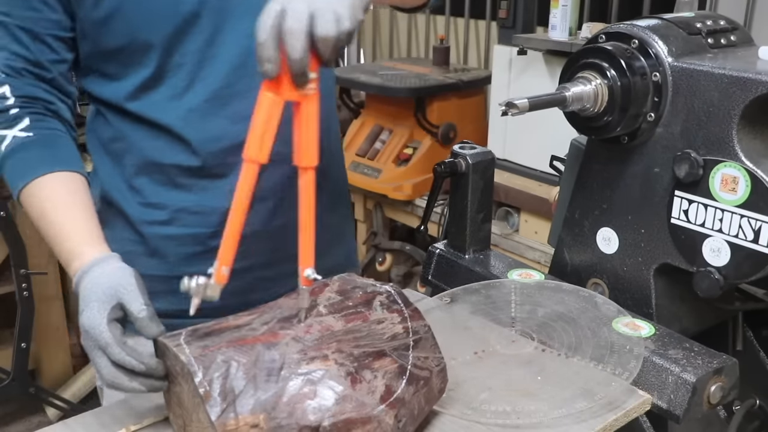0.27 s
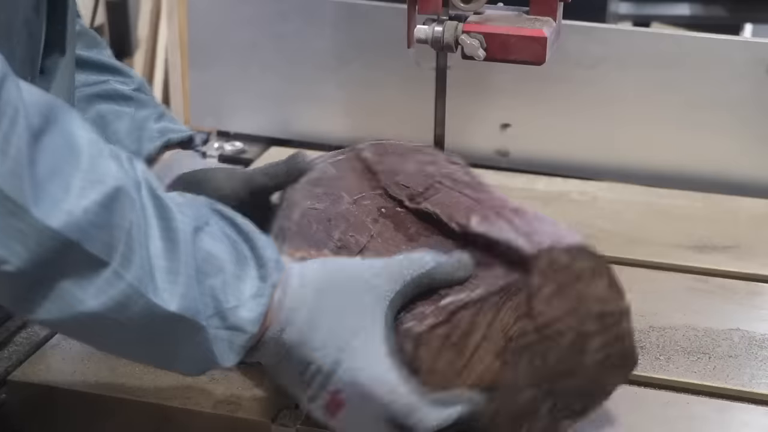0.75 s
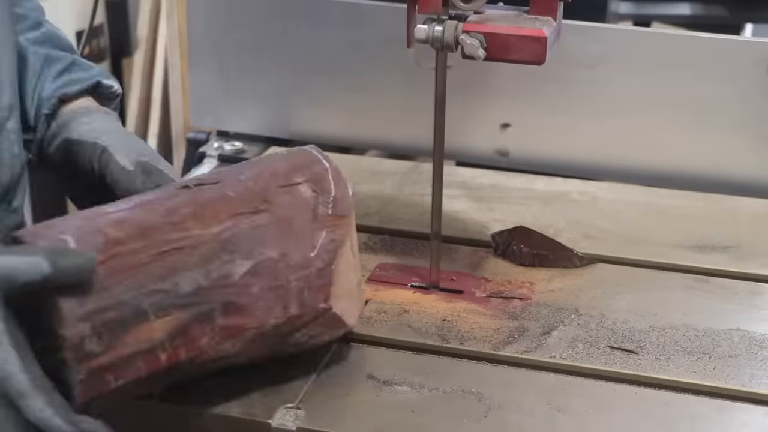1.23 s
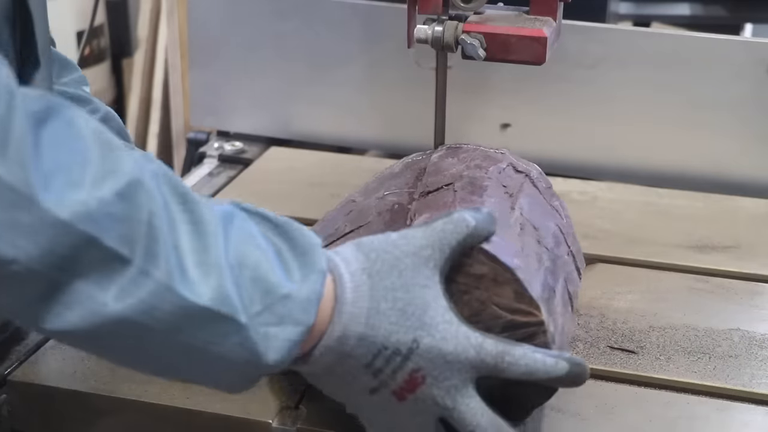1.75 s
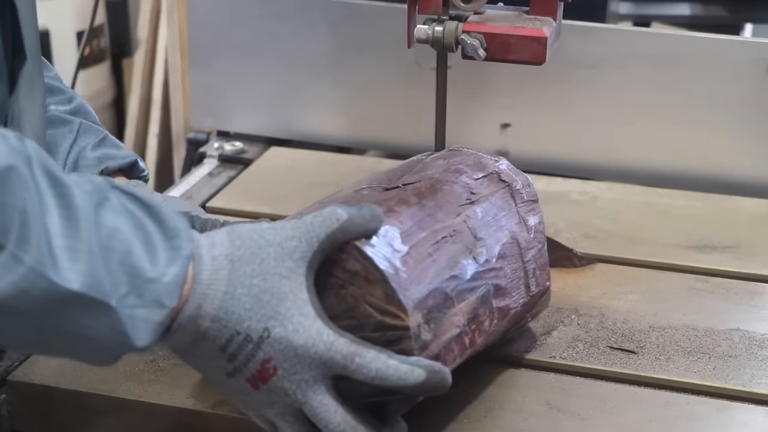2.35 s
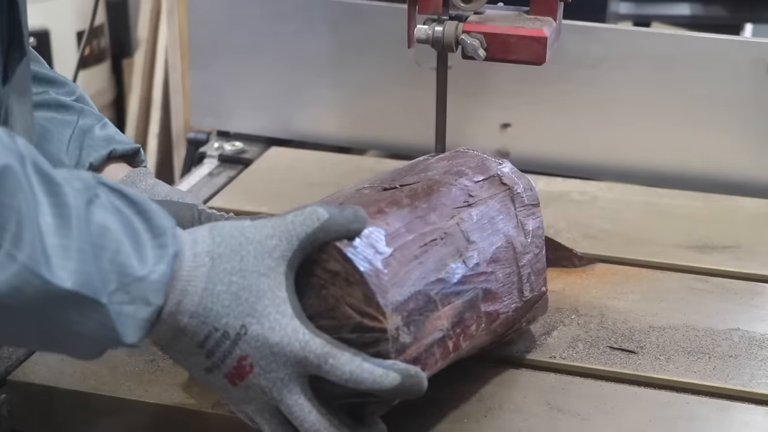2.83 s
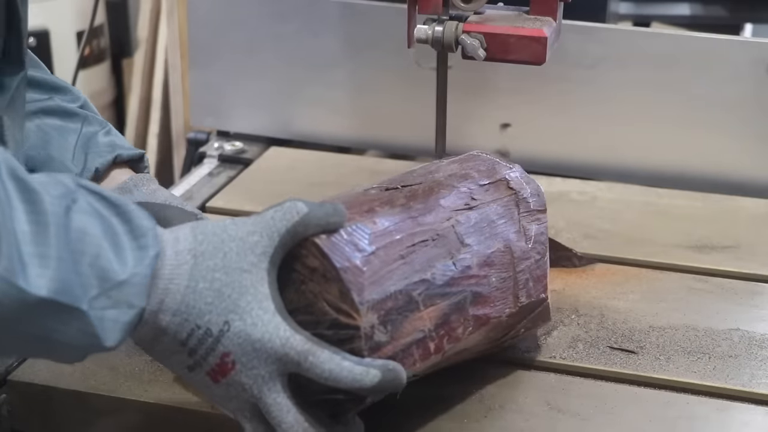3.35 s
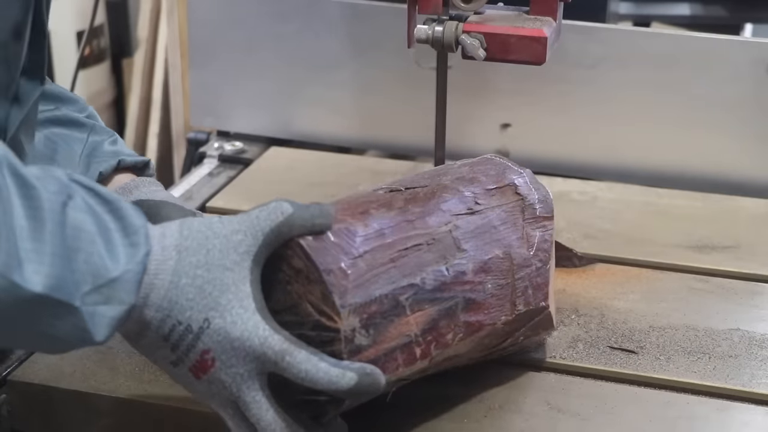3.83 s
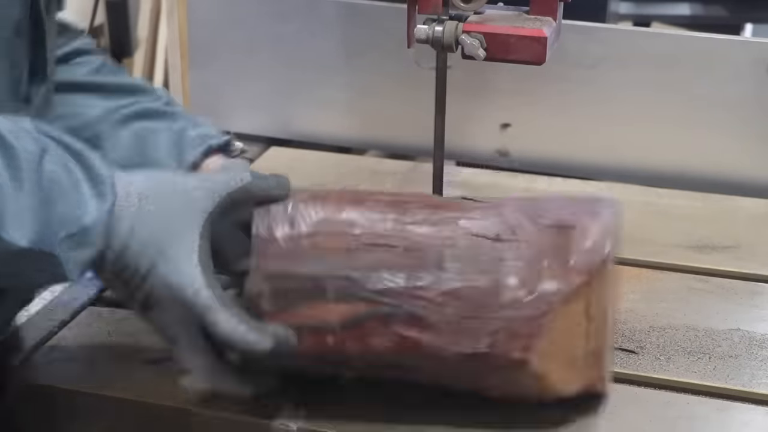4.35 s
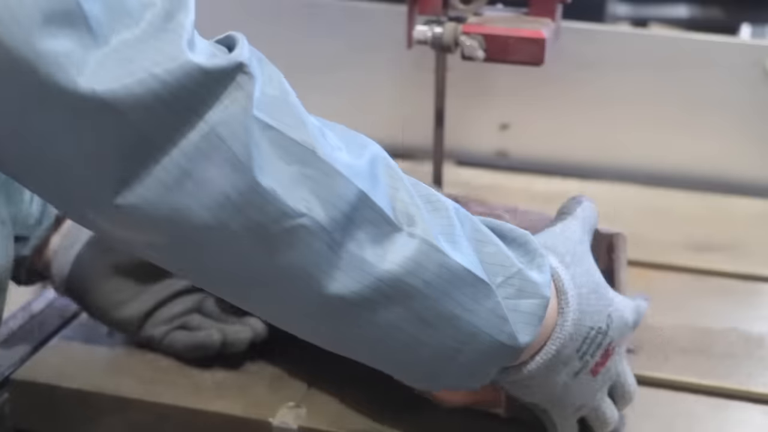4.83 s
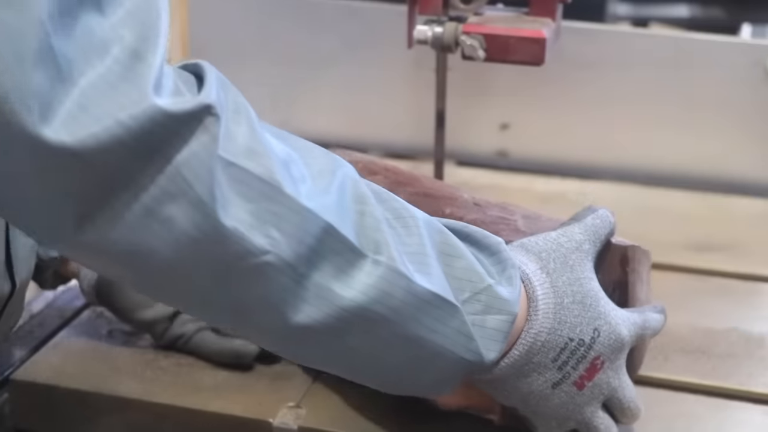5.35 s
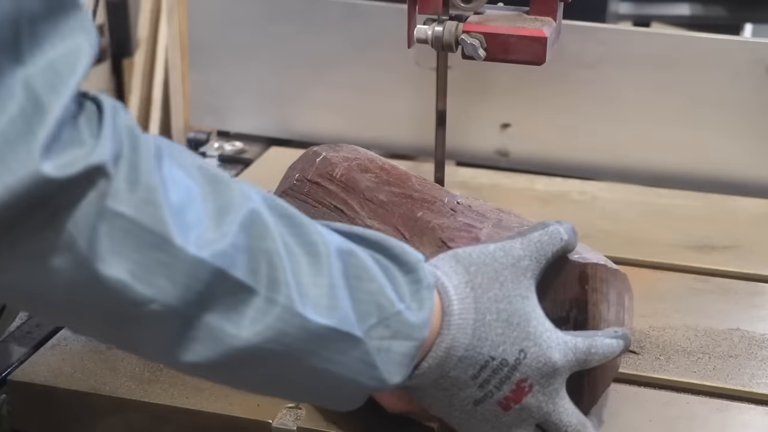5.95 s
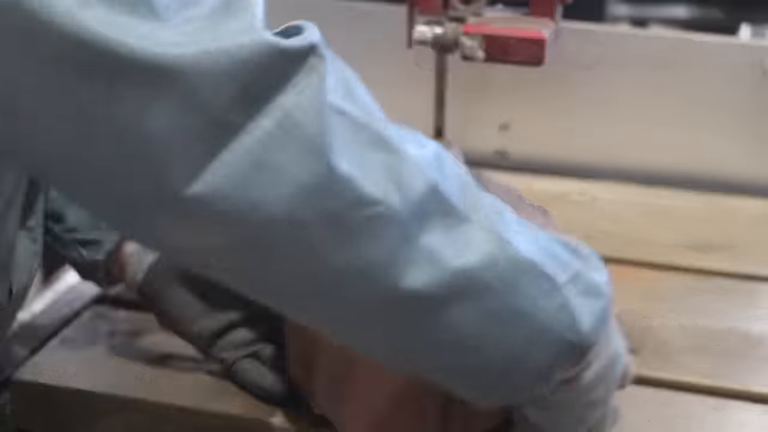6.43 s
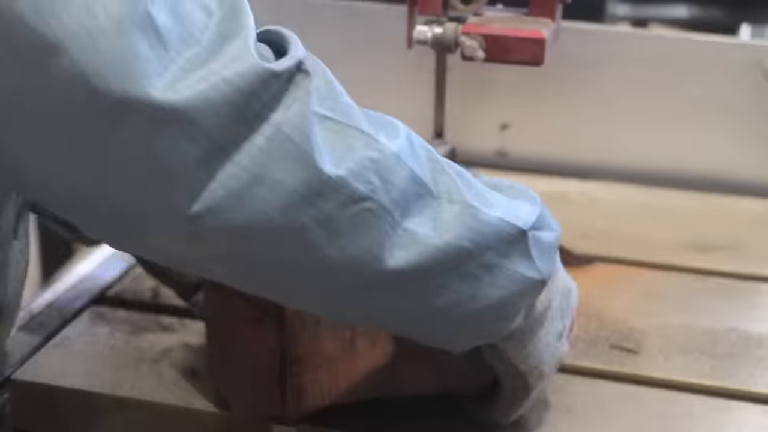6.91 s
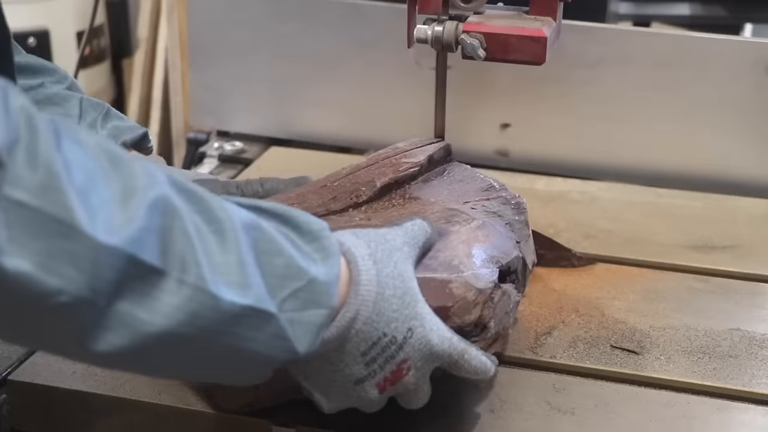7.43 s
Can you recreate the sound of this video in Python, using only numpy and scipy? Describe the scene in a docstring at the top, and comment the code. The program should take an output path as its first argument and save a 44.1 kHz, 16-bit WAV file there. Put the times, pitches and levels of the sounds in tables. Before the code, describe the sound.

Low ventilation and machine hum, one hard tap with a short woody ring, then an abrupt cut to a bandsaw heard close up indoors. The blade hisses and rattles beneath a thin, piercing whine, squealing roughly in its guides. The noise drops in the middle, with fainter sliding whistles, then swells again in louder bursts of squealing, hops to a lower groan and bending whistles, still running at the end.

```python
"""A workshop hums while a tool taps a log; then, abruptly, a bandsaw runs and the log is fed through it.
The free blade hisses, rings and squeals in its guides, under a high whine that follows its speed.
In the cut the wood damps and slows the blade, and most of its sliding, arching whistles sound there.
Shaped noise makes the hiss, rattle and ringing; sine waves make the hum, whine, squeals and whistles."""
import sys
import numpy as np
from scipy import signal
from scipy.fft import rfft, irfft, next_fast_len
from scipy.io import wavfile

SR = 44100
rng = np.random.default_rng(int(sys.argv[2]) if len(sys.argv) > 2 else 0)


def transcribe(u):
    """Save the signal u as a 16-bit wav file named by the first command-line argument.

    u: samples, shape (n,) or (channels, n), limited to [-1, 1]; the rate is SR.
    q: integer samples, one column per channel.
    """
    v = np.clip(np.atleast_2d(u).T, -1, 1)
    q = np.round(v * 32767).astype(np.int16)
    wavfile.write(sys.argv[1], SR, q)


N = 338247
T = np.arange(N) / SR  # time of every sample, s
EDGE_HZ = 15800  # upper edge of the sound


def amp(db):
    """Turns decibels into gain."""
    return 10 ** (np.asarray(db) / 20)


def unit(x):
    """Scales a signal to rms 1."""
    return x / np.sqrt(np.mean(abs(x) ** 2) + 1e-20)


def read(points, hz):
    """Reads a spectrum table on a log-frequency axis."""
    f, value = np.transpose(points)
    return np.interp(np.log(hz + 1), np.log(f), value)


def curves(rows):
    """Gives each column of a curve table at every sample."""
    s, *columns = np.transpose(rows)
    return [np.interp(T, s, column) for column in columns]


def gate(start, end, fade):
    """One between two moments, with short ramps centred on them."""
    opening = np.clip((T - start) / fade + .5, 0, 1)
    closing = np.clip((end - T) / fade + .5, 0, 1)
    return opening * closing


def drift(rate, size=N):
    """Smooth chance movement of rms 1, up to the given rate in Hz."""
    count = int(size / SR * 2 * rate) + 4
    fine = signal.resample(rng.standard_normal(16384)[:count], 4 * count)
    return unit(np.interp(np.arange(size), np.linspace(0, size, len(fine)), fine))


# how wide the noise at the saw spreads: f/Hz, side against middle level/dB
WIDTH = [(60, -2), (120, -1), (240, -0.5), (480, -9.5), (950, -10), (1890, -29), (3770, -17), (7520, -6),
         (15000, 0)]


def noise(shape, spread=WIDTH):
    """Two-channel noise with gain shape(Hz), partly alike left and right."""
    size = next_fast_len(N)
    hz = np.fft.rfftfreq(size, 1 / SR)
    middle, side = rfft(rng.standard_normal((2, size)))
    both = middle + amp(read(spread, hz)) * side * np.array([[1], [-1]])
    return unit(irfft(both * shape(hz), size)[:, :N])


def wash(spectrum, spread=WIDTH):
    """Noise coloured by a spectrum table."""
    return noise(lambda hz: amp(read(spectrum, hz)), spread)


def ringing(modes):
    """Narrow resonances kept going by friction, made as narrow peaks in noise."""
    def gain(hz):
        power = sum(amp(db) ** 2 / w / (1 + ((hz - f) / w) ** 2) ** 2 for f, w, db in modes)
        return np.sqrt(power)
    total = np.sqrt(sum(amp(db) ** 2 for _, _, db in modes))
    return noise(gain) * total


def tones(table, flutter_db, wobble, rate, spread=WIDTH):
    """Steady lines wavering in strength and phase; reflections shift each one between the ears."""
    out = np.zeros((2, N))
    for hz, db in table:
        shift = amp(read(spread, hz)) * rng.choice([-1, 1]) * np.array([[1], [-1]])
        strength = amp(db + flutter_db * drift(rate))
        phase = 2 * np.pi * hz * T + wobble * drift(rate) + shift
        out += strength * np.sqrt(2) * np.sin(phase)
    return out


def room(x, t60, wet_db):
    """Direct sound plus a diffuse tail that differs at each ear."""
    t = T[:SR // 2]
    tail = rng.standard_normal((2, len(t))) * amp(-60 * t / t60) * (t > .001)
    tail = tail / np.linalg.norm(tail[0])
    return x + amp(wet_db) * signal.fftconvolve(x[None], tail, axes=1)[:, :N]


def patchy(x, depth_db, count=24):
    """Neighbouring bands of a sound swell and fade on their own."""
    size = next_fast_len(N)
    spectrum = rfft(x, size)
    place = np.fft.rfftfreq(size, 1 / SR) / EDGE_HZ * count
    out = np.zeros((2, N))
    for k in range(count + 1):
        band = irfft(spectrum * np.clip(1 - abs(place - k), 0, 1), size)[:, :N]
        out += band * amp(depth_db * drift(5))
    return unit(out)


def stick_slip(rows, cling, boost_db, jitter, slip, flutter_db, flutter_rate, rasp):
    """A friction tone clings to the blade's even modes, is louder on them, and sags as the grip slips."""
    mode_hz, gap_hz = 4420, 470  # one blade mode, and the step to the next
    start, end = rows[0][0], rows[-1][0]
    span = (T >= start) & (T < end)
    hz, db = (curve[span] for curve in curves(rows))
    size = len(hz)
    grip = drift(flutter_rate, size)
    off_mode = 2 * np.pi * (hz - mode_hz) / gap_hz
    hz = hz - cling * gap_hz / (2 * np.pi) * np.sin(off_mode)
    slipping = np.maximum(.7 * drift(130, size) - grip, 0)
    hz = hz * (1 + jitter * drift(400, size) - slip * slipping)
    strength = amp(flutter_db * np.tanh(grip) + boost_db * np.cos(off_mode))
    strength = strength * (1 + rasp * drift(350, size))
    out = np.zeros(N)
    out[span] = amp(db) * unit(strength) * np.sqrt(2) * np.sin(2 * np.pi * np.cumsum(hz) / SR)
    return out * gate(start + .005, end - .005, .01)


# colour of the workshop air: f/Hz, relative level/dB
SHOP = [(25, -30), (50, -18), (70, -1), (100, -5.5), (150, 0), (250, -4), (450, -6), (950, -6.5),
        (1440, -13.5), (2550, -12.5), (3200, -19.5), (7260, -28), (15500, -32)]
# how wide the workshop spreads: f/Hz, side against middle level/dB
SHOP_WIDTH = [(60, -27), (180, -22), (550, -11), (1650, -2.5), (4970, 0.5), (15000, 0)]
# machines humming in the workshop: f/Hz, level/dB
HUM = [(76, -50), (120, -60), (149, -60.5), (167, -57), (221, -61.5), (339, -61), (608, -60.5)]


def workshop():
    """Steady ventilation is coloured noise; humming machines are wavering low tones."""
    air = amp(-46.5) * wash(SHOP, SHOP_WIDTH)
    return air + tones(HUM, flutter_db=1.5, wobble=0.32, rate=4.7, spread=SHOP_WIDTH)


# knocks on the log: t/s, starting level/dB, centre f/Hz, width/Hz, time to fall 60 dB t/s
KNOCKS = [(.019, -50, 6000, 3000, 0.056), (.253, -39, 820, 350, 0.18), (0.261, -30.5, 4530, 2600, 0.016),
          (0.2604, -30, 2900, 900, 0.021), (.264, -43.5, 3440, 3480, 0.11), (.274, -37, 754, 500, 0.083),
          (1.181, -47, 1240, 500, 0.055)]


def knocks():
    """Dying noise bursts: the tool point's tick, the duller blow, and the log set on the saw table."""
    out = np.zeros(N)
    for s, db, centre, width, t60 in KNOCKS:
        burst = noise(lambda hz: hz / (hz + 400) / (1 + ((hz - centre) / width) ** 2))[0]
        attack = np.clip((T - s) * centre / 2, 0, 1)  # two cycles of the centre pitch
        out += burst * attack * amp(db - 60 * np.clip(T - s, 0, 1) / t60)
    return room(out, t60=0.18, wet_db=-7.5)


# ringing of the log and its bench: f/Hz, starting level/dB, time to fall 60 dB t/s
LOG = [(124.5, -36.5, 0.35), (217, -35, 0.27), (271.6, -31.5, 0.24), (487, -36.5, 0.2), (744, -37, 0.16),
       (843, -38, 0.28), (887, -33.5, 0.14), (917, -38.5, 0.26)]


def log_thud(start=.273, rise=0.0027):
    """The log and its bench ring briefly under the tap, as dying sine waves."""
    t = np.clip(T - start, 0, 2)
    modes = np.zeros(N)
    for hz, db, t60 in LOG:
        modes += amp(db - 60 * t / t60) * np.sin(2 * np.pi * (hz * t + rng.random()))
    return room(modes * (1 - np.exp(-t / rise)), t60=.2, wet_db=-25)


# the free blade bears on its guides:
# start t/s, attack t/s, easing-off start t/s, release t/s, strength 0-1
PUSHES = [(.76, 0.11, 1.62, 1.65, 0.93), (3.63, .06, 3.67, 0.12, 0.2), (4.33, 0.076, 4.78, 0.86, 0.95),
          (5.4, .06, 5.5, 0.303, 0.65), (5.6, 0.085, 5.76, .3, 0.5), (6.01, 0.079, 6.6, 1.2, 1),
          (7.3, .12, 7.47, 0.36, .8)]


def push():
    """How hard the blade bears on its guides, 0-1: each push rises, holds and eases off."""
    efforts = []
    for s, attack, eases, release, strength in PUSHES:
        shape = np.minimum((T - s) / attack, 1 - (T - eases) / release)
        efforts.append(strength * np.clip(shape, 0, 1))
    return np.max(efforts, axis=0)


def drag():
    """How much the wood holds the blade back, 0-1: it takes over as the push weakens."""
    return np.clip(1.4 * (1 - push()), 0, 1)


# partials of the tooth pattern, the 25th being the whine: multiple, relative level/dB
ORDERS_DB = [(1, -35), (2, -38.5), (21, -17.5), (23, -13), (24, -14), (25, 1.5), (26, -40), (27, -14.5),
             (29, -16.5)]
FREE_HZ, SAG_HZ = 9987, 48  # whine of the free blade, and its drop when the wood slows it
WHINE_DB, WHINE_RISE_DB = -54.5, 9.5  # level with the blade slowed in the wood, and its rise at push 1


def whine(flutter_db=4, flutter_rate=4, waver_db=2.1, waver_rate=5):
    """The repeating teeth give clean partials that sag and waver under drag; weak ones swell and fade."""
    whine_hz = FREE_HZ - SAG_HZ * drag() + 2 * drift(40)
    turns = np.cumsum(whine_hz) / SR / 25
    partials = np.zeros(N)
    for k, level in ORDERS_DB:
        swell_db = flutter_db * np.tanh(drift(flutter_rate)) * (level < -6)
        partials += amp(level + swell_db) * np.sin(2 * np.pi * (round(k) * turns + rng.random()))
    waver = waver_db * drag() * drift(waver_rate) + .5 * drift(30)
    level_db = WHINE_DB + WHINE_RISE_DB * push() + waver
    return unit(partials) * amp(level_db) * amp([[-4.5], [3]])  # louder on the right


# colour of the tooth hiss: f/Hz, relative level/dB
HISS = [(3400, -49), (5800, -9.5), (7140, -1), (7990, -7), (8400, -2), (10000, -1.5), (12000, -2.5),
        (15100, -4.5), (15700, -5.5)]


def tooth_hiss():
    """The running teeth hiss in grains, louder with the push and rougher with the drag."""
    grain = amp((1.0 + 0.6 * drag()) * drift(300) + 0.68 * drift(26))
    level_db = -54 + 7.5 * push()
    return amp(level_db) * patchy(wash(HISS), depth_db=1.03, count=16) * unit(grain)


# colour of the band rattle: f/Hz, relative level/dB
RATTLE = [(150, -48), (400, -27), (900, -15.5), (1150, -12.5), (1400, -4), (1650, -9.5), (2200, -1),
          (3000, 1.5), (4500, 2), (5600, -2), (7000, -27)]
# ringing of blade and guides: f/Hz, width/Hz, level/dB against the shared level_db
FRAME = [(1453, 42, -9.5), (1905, 19, -13.5), (2584, 10, -12), (2685, 10, -11.5), (2926, 41, -10.5),
         (3010, 14, -8.5), (3083, 9.7, -7), (3995, 30, -8), (5390, 13, -7.5), (5889, 25, -11)]
# steady tones of the running frame: f/Hz, level/dB against the shared level_db
FRAME_TONES = [(511, -23.5), (603, -18), (800, -24.5), (1230, -14.5), (1518, -13), (1793, -15),
               (2051, -11.5), (2186, -11), (2299, -24), (2905, -5)]


def band_rattle():
    """The band rattles as unsteady noise while blade, guides and frame ring, all following the push."""
    level_db = -66.5 + 11 * push() ** 0.76
    rattle = amp(3.0) * wash(RATTLE) * amp(1.6 * drift(60))
    frame = ringing(FRAME) + tones(FRAME_TONES, flutter_db=2.0, wobble=0.61, rate=7)
    return amp(level_db) * (rattle + frame)


# steady whistle of the machine: f/Hz, level/dB at full drag
DRAG_TONES = [(8742, -75), (10196, -64), (11650, -70), (14563, -61.5), (15246, -69)]


def drag_tones():
    """The machine whistles in steady tones while the wood drags on the blade."""
    return drag() * tones(DRAG_TONES, flutter_db=3.0, wobble=0.98, rate=12)


# colour of the air at the saw: f/Hz, relative level/dB
SAW_FLOOR = [(20, -2), (100, -2), (250, -1), (600, 2.5), (1500, -1), (4000, -4.5), (15000, -16.5)]


def saw_air():
    """The air at the saw is a faint, steady noise."""
    return amp(-71) * wash(SAW_FLOOR)


# the squeal hops down to a lower blade mode:
# start t/s, length t/s, level/dB before the -0.5 dB in blade_tones()
HOPS = [(1.753, 0.081, -45.5), (1.896, 0.054, -53), (2.267, 0.13, -51), (2.467, .11, -51), (5.11, .03, -50),
        (5.178, 0.026, -48), (5.248, .07, -48), (5.36, 0.094, -46.5), (6.05, 0.26, -50.5),
        (6.422, 0.042, -47), (6.635, 0.032, -42.5), (6.698, 0.064, -48), (6.92, 0.039, -46.5),
        (7.243, 0.038, -49)]


def hop_gates():
    """Says when each hop is on, and pairs it with its level."""
    fade_s = 0.023
    return [(gate(s, s + length, fade_s), db) for s, length, db in HOPS]


# the lower blade mode of the hops and its close neighbour: f/Hz, width/Hz, relative level/dB
LOW_MODES = [(3582, 30, 0), (3500, 170, -7.5)]


def lower_mode_groan(hops):
    """Friction rings the lower mode in hops; between them it sounds faintly under a push."""
    faint = amp(-55.5) * push() ** 2
    hopping = sum(amp(db) * on for on, db in hops)
    return ringing(LOW_MODES) * np.maximum(hopping, faint)


# falling whoops as the blade loses its grip:
# start t/s, length t/s, start f/Hz, end f/Hz, starting level/dB before the +5 dB in blade_tones()
WHOOPS = [(0.797, .11, 4950, 3280, -52.5), (1.74, 0.053, 4100, 3350, -53), (2.827, 0.15, 3700, 2650, -54),
          (3.014, .2, 4813, 2096, -56.5), (3.549, .05, 4100, 3100, -58), (4.365, .035, 4400, 3200, -51.5),
          (5.401, .11, 3700, 1950, -52.5), (7.497, 0.097, 3500, 1933, -54.5)]


def whoop(start, length, start_hz, end_hz, db):
    """Pitch drops, fast at first, while the tone breaks up and dies away."""
    fade_db, bend = -20.5, .75
    u = np.linspace(0, 1, num=33)
    hz = start_hz * (end_hz / start_hz) ** (u ** bend)
    path = np.transpose([start + u * length, hz, db + fade_db * u])
    return stick_slip(path, cling=0.86, boost_db=0.5, jitter=.035, slip=0.026,
                      flutter_db=8.5, flutter_rate=60, rasp=0.45)


def squeal(pitch, swell, db, fall_db):
    """The path of one squeal: it follows its pitch curve, swells, then fades."""
    onset_db = -10.5
    times, hz = np.transpose(pitch)
    u = np.linspace(0, 1, num=129)
    s = times[0] + u * (times[-1] - times[0])
    swelling_db = onset_db * np.clip(1 - (s - s[0]) / swell, 0, 1)
    return np.transpose([s, np.interp(s, times, hz), db + swelling_db - fall_db * u ** 2])


# pitch of the blade squealing in its guides, one list for each stretch: t/s, f/Hz
SQUEALS = [
    [(.8, 4370), (1.55, 4420), (1.74, 4260), (1.78, 3800), (1.86, 4250), (1.98, 4036), (2.21, 4340),
     (2.32, 4040)],
    [(4.37, 4020), (4.49, 4315), (4.76, 4390), (5.02, 4103), (5.43, 4034)],
    [(6.05, 4045), (6.3, 4052), (6.6, 4216), (6.8, 4185), (7.05, 4320), (7.3, 4100), (7.46, 4116),
     (7.67, 4300)],
]
# how each stretch swells and fades:
# swell t/s, top level/dB before the +0.5 dB in blade_tones(), fall by its end level/dB
SQUEAL_SHAPES = [(.08, -47.5, 4), (0.035, -47.5, 1), (.36, -44.5, 5.5)]


def guide_squeal(lower_pitch=0.96, lower_db=-5):
    """The blade rubs at two guides: a steadier squeal above the table, a rougher, flatter one below."""
    squeals = [squeal(pitch, *shape) for pitch, shape in zip(SQUEALS, SQUEAL_SHAPES)]
    # each stretch trembles and breaks up more than the last
    jitters, breaks_db = [.01, .016, .019], [-4.5, -5.4, -6.3]
    upper = np.zeros(N)
    for rows, jitter, break_db in zip(squeals, jitters, breaks_db):
        tone = stick_slip(rows, cling=.9, boost_db=1.5, jitter=jitter, slip=1.8 * jitter,
                          flutter_db=4.5, flutter_rate=35, rasp=0.13)
        upper += tone * amp(break_db * np.clip(drift(14), 0, 1))
    lower = sum(stick_slip(rows * [1, lower_pitch, 1], cling=.5, boost_db=1.5, jitter=0.0352, slip=.03,
                           flutter_db=7, flutter_rate=70, rasp=0.84) for rows in squeals)
    return upper + amp(lower_db) * lower


# tones that sing for a moment, most from single blade modes, a few near 10 kHz flanking the whine in the cut:
# start t/s, length t/s, f/Hz, width/Hz, level/dB
SINGING = [(.85, 1.1, 3583, 10, -52.5), (.9, 0.81, 3020, 10, -60), (1.767, 0.64, 1227, 1.55, -62.5),
           (2.03, 0.049, 2910, 20, -50), (2.11, 0.045, 2905, 21, -48.5), (2.68, .22, 1781, 8.8, -69),
           (4.756, 0.33, 1793, 2.9, -61.5), (6.105, 0.21, 2905, 7.6, -51.5), (6.482, 0.17, 1793, 3, -57.5),
           (1.5, 0.29, 8450, 250, -58), (2.416, 0.092, 10170, 150, -53), (2.915, 0.1, 10260, 200, -54),
           (3.328, 0.14, 9900, 276, -58), (5.629, .28, 13340, 30, -58)]


def singing(start, length, hz, width, db):
    """One tone swells and fades; the wider it is, the more its pitch trembles."""
    turns = np.cumsum(hz + .7 * width * drift(width + 2)) / SR
    swell = gate(start + length / 6, start + length * 5 / 6, length / 3)
    return amp(db) * swell * np.sqrt(2) * np.sin(2 * np.pi * turns)


# whistles of the blade, most in the cut, a few low or faint ones under the squeal, each one arch of pitch:
# start t/s, rise t/s, fall t/s, start f/Hz, top f/Hz, end f/Hz,
# level/dB before the +5 dB in blade_tones(), roughness (about 0-1)
WHISTLES = [(1.78, .08, 0.072, 3450, 4190, 3650, -54, 0.84),
            (1.92, .03, 0.073, 3990, 4100, 3550, -57.5, .8), (1.85, .13, .08, 4890, 5400, 4700, -53, 0.56),
            (2.129, 0.2, 0.13, 4800, 5510, 4970, -55, 0.6),
            (2.16, 0.019, 0.19, 6850, 6900, 6200, -55, 0.74),
            (2.33, 0.37, .09, 4780, 4900, 4780, -57.5, .7), (2.49, 0.13, .2, 5110, 5450, 5380, -54.5, .55),
            (2.72, .04, .04, 5403, 5950, 5400, -57, 1.08), (2.8, .04, .19, 5370, 5350, 4900, -57.5, 0.47),
            (3.15, .05, .06, 4513, 4560, 4540, -59.5, 0.51),
            (3.261, .17, .13, 4560, 5040, 4250, -60.5, 0.46), (4.29, .07, 0.021, 4400, 5000, 4900, -58, .4),
            (5.32, .06, .06, 4434, 4660, 4707, -58, 1.05), (5.44, .12, .07, 4676, 4900, 4900, -50, 0.31),
            (5.62, .12, .24, 4980, 5425, 5060, -52.5, .5),
            (5.72, 0.066, 0.064, 5300, 5660, 5250, -56.5, 1.03),
            (5.99, .02, 0.044, 4990, 4920, 4890, -54, 0.39), (6.05, 0.086, .17, 3450, 3500, 3500, -53, .4),
            (.88, 0.038, .48, 1040, 1034, 955, -77, .5), (4.58, 0.13, 0.37, 1065, 1110, 940, -79, 0.6),
            (6.38, .03, .29, 1055, 1053, 966, -80, 0.53)]


def whistle(start, rise, fall, start_hz, top_hz, end_hz, db, rough):
    """Pitch bends from its start to the top and on to its end; the tone is loudest midway."""
    ends_db, fall_power = -1, 2.2
    u = np.linspace(0, 1, num=33)
    t = u * (rise + fall)
    before = np.clip(1 - t / rise, 0, 1)
    after = np.clip((t - rise) / fall, 0, 1)
    hz = top_hz + (start_hz - top_hz) * before ** 1.5 + (end_hz - top_hz) * after ** fall_power
    path = np.transpose([start + t, hz, db + ends_db * (2 * u - 1) ** 2])
    return stick_slip(path, cling=.7, boost_db=2, jitter=.018 * rough, slip=0.02004 * rough,
                      flutter_db=5.4 * rough, flutter_rate=45, rasp=.5 * rough)


def blade_tones():
    """Rough squeal with its hops to a lower mode, cleaner whistles of the blade, and brief singing tones."""
    hops = hop_gates()
    groan = lower_mode_groan(hops)
    whoops = sum(whoop(*row) for row in WHOOPS)
    duck_db = -4.5 * sum(on for on, db in hops)  # the guide squeal gives way during a hop
    squealing = guide_squeal() * amp(duck_db)
    modes = sum(singing(*row) for row in SINGING)
    whistles = sum(whistle(*row) for row in WHISTLES) + whoops
    friction = room(amp(0.5) * squealing + amp(5.0) * whistles, t60=0.11, wet_db=-11.5)
    return friction + amp(-0.5) * groan + modes


# where the saw stands: f/Hz, left minus right level/dB
LEAN = [(100, -6), (1300, -0.5), (2800, -1), (4800, -.5), (8100, -1.5), (15000, -4)]


def scene():
    """The workshop gives way at once to the saw, which stands a little to the right."""
    running = gate(.664, 9, 0.0061)
    bench = (1 - running) * workshop() + knocks() + log_thud()
    blade = tooth_hiss() + band_rattle() + drag_tones() + saw_air() + blade_tones()
    size = next_fast_len(N)
    lean_db = read(LEAN, np.fft.rfftfreq(size, 1 / SR)) * np.array([[.5], [-.5]])
    saw = irfft(rfft(blade, size) * amp(lean_db), size)[:, :N] + whine()
    return running * saw + bench * amp([[-.6], [.6]])


def record(dry):
    """A steep filter removes what lies above the upper edge."""
    low_pass = signal.firwin(511, EDGE_HZ, window=("kaiser", 9), fs=SR)
    return signal.oaconvolve(dry, low_pass[None], "same")


dry = scene()
out = record(dry)
transcribe(out)
```